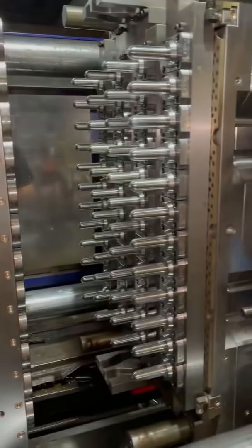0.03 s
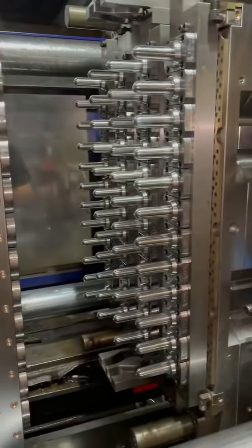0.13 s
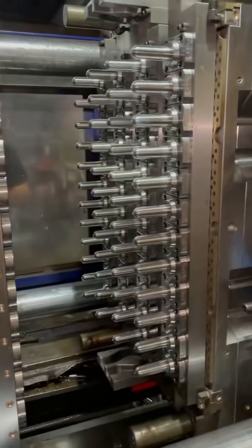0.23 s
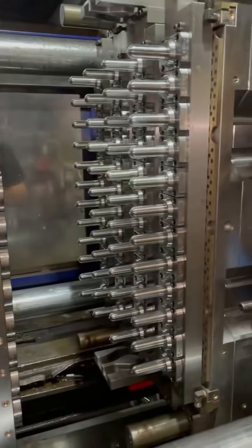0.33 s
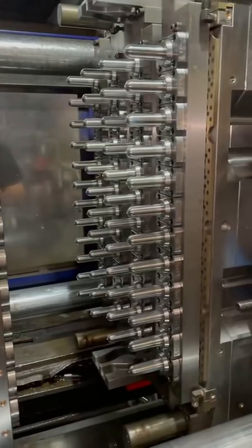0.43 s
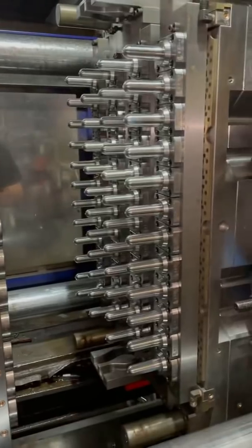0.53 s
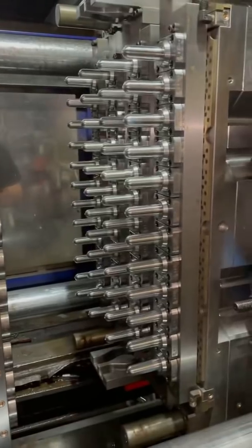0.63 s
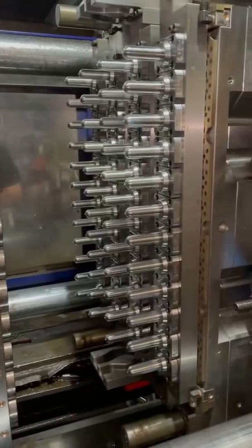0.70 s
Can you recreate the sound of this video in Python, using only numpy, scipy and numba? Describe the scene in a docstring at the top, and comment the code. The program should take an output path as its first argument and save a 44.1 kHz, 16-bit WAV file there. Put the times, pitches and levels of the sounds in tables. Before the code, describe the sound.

Injection moulding machine clatters and clanks its steel mould parts, then vents air in a fading hiss

```python
"""Steel mould parts of an injection moulding machine clatter, clank and squeak: showers of tiny impacts,
single ringing knocks and gliding bands of noise. A hard knock near 2.25 s ends most of the clatter.
Behind them a motor hums (wavering sines) and the drive and factory rumble (coloured, flickering noise).
A valve vents air near 2.5 s (noise again), which slowly dies away. A hall adds its echo to the parts,
and a phone with two close microphone ports listens."""
import sys
import numpy as np
from scipy import signal
from scipy.fft import rfft, irfft
from scipy.io import wavfile
from scipy.ndimage import uniform_filter1d
from numba import njit

SR = 44100
rng = np.random.default_rng(int(sys.argv[2]) if len(sys.argv) > 2 else 0)


def gain_from_decibels(decibels):
    """Convert decibel values to linear amplitude factors."""
    exponent = np.asarray(decibels, float) / 20
    return 10 ** exponent


def master(y):
    """Save y as 16-bit WAV."""
    cut = np.clip(np.atleast_2d(y).T, -1, 1)
    pcm = np.round(cut * 32767)  # scale
    wavfile.write(sys.argv[1], SR, pcm.astype(np.int16))


N = 176400
T = np.arange(N) / SR
GRID_HZ = np.arange(N // 2 + 1) * SR / N


def curve(rows):
    """Gain along time, drawn through (t/s, level/dB) rows."""
    return gain_from_decibels(np.interp(T, *np.array(rows, float).T))


def along_hz(rows, col):
    """One table column, drawn along log frequency for every bin of the whole sound."""
    rows = np.array(rows, float)
    return np.interp(np.log(GRID_HZ + 1), np.log(rows[:, 0]), rows[:, col])


def unit(x):
    """Scale to rms 1."""
    return x / np.sqrt(np.mean(x ** 2))


def walk(rate):
    """Slow random wander: a new random value every 1 / rate s, smoothed twice."""
    k = int(SR / rate)
    steps = np.repeat(rng.standard_normal(N // k + 1), k)
    return uniform_filter1d(uniform_filter1d(steps, k), k)[:N]


def wash(colour, flicker, rate):
    """Coloured noise of rms 1 whose octave bands flicker apart; flicker is in dB before smoothing."""
    spec = rfft(rng.standard_normal(N)) * gain_from_decibels(along_hz(colour, 1))
    octave = np.log2(GRID_HZ + 1)
    out = 0
    for centre in np.arange(4, 15):
        band = irfft(spec * np.clip(1 - abs(octave - centre), 0, 1), N)
        out = out + band * gain_from_decibels(flicker * walk(rate))
    return unit(out)


@njit
def rings(start, hz, t60, size, rise):
    """Sum of decaying sines that swell over the contact time and end after t60."""
    out = np.zeros(N)
    for k in range(len(start)):
        turn = np.exp((2j * np.pi * hz[k] - np.log(1000) / t60[k]) / SR)
        z = size[k] + 0j
        for i in range(int(start[k] * SR), min(N, int((start[k] + t60[k]) * SR))):
            out[i] += z.imag * min(1., (i / SR - start[k]) / rise + .1)
            z *= turn
    return out


def tail(t60):
    """Half a second of decaying noise with unit energy, like a room's echoes."""
    t = T[:SR // 2]
    h = rng.standard_normal(len(t)) * gain_from_decibels(-60 * t / t60)
    return h / np.sqrt(np.sum(h ** 2))


# deep rumble through the floor (t/s, level/dB) and its colour (f/Hz, relative level/dB per Hz)
DEEP = [(0.05, -31.5), (1.32, -49), (1.44, -43), (1.77, -48.5), (2.24, -39), (2.28, -55), (3.0, -56)]
DEEP_COLOUR = [(12, -44), (20, -25), (38, -8), (65, 5), (100, 1.5), (130, -35), (220, -120)]


def deep_rumble():
    """Very low noise through the floor, slowly flickering."""
    return curve(DEEP) * wash(DEEP_COLOUR, 1.8, 3.7)


# machine rumble (t/s, level/dB) and its colour (f/Hz, relative level/dB per Hz)
RUMBLE = [(0.05, -23), (0.64, -26.5), (1.39, -31), (1.6, -41), (1.75, -53), (1.94, -42), (2.18, -36),
          (2.37, -29.5), (2.56, -41), (2.89, -36.5), (3.01, -42.5), (4.0, -43)]
RUMBLE_COLOUR = [(15, -41), (25, -21), (59, -5), (130, 1.5), (200, -4), (226, -4), (354, -1), (467, -21),
                 (609, -17), (700, -11.5), (1000, -63)]


def rumble():
    """Low coloured noise of the machine, rising and falling along its table."""
    return curve(RUMBLE) * wash(RUMBLE_COLOUR, 3.15, 8)


# thin treble hiss of the running machine, then what is left after the motion (t/s, level/dB)
HISS = [(0.05, -41.5), (0.27, -36), (0.54, -39.5), (1.23, -37), (1.39, -35), (1.51, -36), (1.68, -41),
        (2.3, -65), (2.48, -43)]
HISS_IDLE = [(2.6, -68)]
# its colour (f/Hz, relative level/dB per Hz)
HISS_COLOUR = [(2000, -2), (4500, 6), (7000, 1.5), (11500, -0.5), (12500, -56)]


def treble_hiss():
    """Thin high noise whose bands flicker."""
    return curve(HISS + HISS_IDLE) * wash(HISS_COLOUR, 3.5, 15.74)


# running noise of the drive, then what is left after the motion (t/s, level/dB)
DRIVE = [(0.05, -28.5), (0.3, -28.5), (1.03, -28), (1.52, -23), (1.76, -26), (2.13, -27), (2.27, -37),
         (2.5, -33)]
DRIVE_IDLE = [(2.56, -44), (4, -41)]
# its colour (f/Hz, relative level/dB per Hz)
DRIVE_COLOUR = [(180, -17.5), (300, 0.5), (464, -7), (615, -7), (952, -5.5), (1200, -11), (2930, -15),
                (7470, -31.5), (9150, -30), (11900, -40.5), (12500, -110)]


def drive():
    """Broad flickering noise of the running drive."""
    return curve(DRIVE + DRIVE_IDLE) * wash(DRIVE_COLOUR, 3.2, 14)


# hum lines (f/Hz, level/dB) and the gain they share as the load changes (t/s, level/dB)
HUM = [(49, -47.5), (77, -44), (157, -39.5), (198, -34), (238, -41.5)]
HUM_LOAD = [(0, 3.5), (.6, 3.5), (1.0, 4.5), (1.17, 7.5), (1.25, -1.5), (2.0, -11.5), (2.2, 0),
            (2.4, -12.5), (4, -22)]


def motor():
    """Steady hum lines, each wavering slightly in pitch and level."""
    hum = 0
    for hz, db in HUM:
        phase = 2 * np.pi * np.cumsum(hz * (1 + 0.0181 * walk(10))) / SR
        hum = hum + np.sqrt(2) * gain_from_decibels(db + 4.6 * walk(14)) * np.sin(phase)
    return curve(HUM_LOAD) * hum


# jet of vented air (t/s, level/dB) and its colour (f/Hz, relative level/dB per Hz)
JET = [(2.52, -21.5), (2.6, -25.5), (3.0, -29), (3.2, -31), (3.7, -33), (4, -38.5)]
JET_COLOUR = [(150, -41), (250, -30), (341, -20), (383, 2.5), (415, -1), (548, -5), (926, -3), (4840, -3.5),
              (6710, -2), (7400, -4), (10800, -2), (11900, -10), (12400, -90)]
# low roar of the vented air (t/s, level/dB) and its colour (f/Hz, relative level/dB per Hz)
ROAR = [(2.5, -35), (2.7, -29), (3.0, -39), (3.3, -45.5), (4, -60)]
ROAR_COLOUR = [(250, -54), (600, -1.5), (1100, 1.5), (2500, -2.5), (5000, -7), (12000, -43)]
AIR_S, AIR_RISE_S = 2.498, .012


def air():
    """The valve opens quickly; jet noise and a lower roar then die away along their tables."""
    jet = curve(JET) * wash(JET_COLOUR, 2.2, 44)
    roar = curve(ROAR) * wash(ROAR_COLOUR, 1.1, 13)
    opening = np.clip((T - AIR_S) / AIR_RISE_S, 0, 1) ** 2
    return opening * (jet + roar)


# squeaks of sliding metal (start t/s, end t/s, start f/Hz, end f/Hz, width f/Hz, level/dB)
SQUEAKS = [(0.733, 0.785, 3220, 3130, 119, -29), (0.737, 0.786, 2310, 2500, 197, -28),
           (0.742, 0.802, 1500, 1706, 250, -27), (0.79, 0.84, 1680, 1895, 300, -28),
           (0.825, 0.953, 2750, 2790, 78, -38.5), (0.847, 0.898, 5600, 5430, 101, -39),
           (0.876, 0.935, 5800, 5850, 80, -39), (0.914, 0.975, 5400, 5600, 150, -33),
           (0.883, 0.94, 1930, 1950, 101, -40.5), (.935, 0.974, 2140, 1800, 199, -32),
           (1.168, 1.328, 957, 975, 60, -28.5), (1.228, 1.32, 4850, 4930, 149.6, -41),
           (1.895, 2.107, 415, 420, 24.2, -34.5), (1.99, 2.194, 348, 351, 25.1, -41.5),
           (3.764, 3.905, 340, 339.5, 118, -37)]


def squeaks():
    """Narrow gliding bands of stick-slip noise."""
    out = 0
    for start, end, hz0, hz1, width, db in SQUEAKS:
        k = max(int(SR / width), 2)
        # two slow noises carried by a cosine and a sine make one narrow band
        slow = uniform_filter1d(rng.standard_normal((2, N)), k, axis=1) * np.sqrt(k)
        phase = 2 * np.pi * np.cumsum(np.interp(T, [start, end], [hz0, hz1])) / SR
        band = slow[0] * np.cos(phase) + slow[1] * np.sin(phase)
        fade = np.clip(np.minimum(T - start, end - T) / 0.013, 0, 1)
        out = out + gain_from_decibels(db) * fade * band
    return out


# blows on one steel bar (t/s, level/dB) and the bar's modes (f/Hz, level/dB, t60 t/s)
BAR_BLOWS = [(1.338, -5.5), (1.361, -14)]
BAR = [(978, -4, 0.2), (2417, -9, 0.044), (2028, 3, 0.034), (2160, -9, 0.13), (3130, -16, 0.08),
       (1880, -13, 0.029)]
# knocks on other parts, one main ring each (t/s, level/dB, f/Hz, t60 t/s)
KNOCKS = [(0.697, -5, 335, 0.035), (.718, -24, 4700, 0.067), (2.484, -24, 290, 0.13),
          (1.030, -16.5, 2560, 0.07), (1.179, -12.5, 420, 0.22), (1.179, -7, 1260, 0.061),
          (1.174, -14.5, 3200, 0.11), (1.21, -19, 2600, .08), (1.388, -18, 3950, 0.044),
          (1.047, -18, 2550, .1), (1.427, -16.5, 400, 0.21), (1.465, -15, 414, 0.12),
          (1.47, -20, 118, 0.38), (2.506, -25.5, 1300, 0.24), (1.598, -12, 696, .06),
          (1.7, -11, 480, 0.047), (1.487, -14, 3200, .07), (1.487, -12, 4900, .06), (1.514, -9, 1530, 0.1),
          (1.9, -18, 420, 0.12), (1.568, -17.5, 3250, 0.13), (1.586, -12, 400, 0.18),
          (1.63, -15.5, 1280, 0.11), (2.261, -17, 527, 0.089), (2.249, -9.5, 1860, 0.056),
          (2.254, -10, 2550, 0.06), (2.1, -24, 380, .2)]
CONTACT_S = 0.0014


def blows():
    """Bar blows ring all the bar's modes; other knocks ring a close pair of pitches."""
    rows = []
    for start, db in BAR_BLOWS:
        for hz, mode_db, t60 in BAR:
            detuned = hz * (1 + 0.0054 * rng.standard_normal())
            rows.append((start, detuned, t60, gain_from_decibels(db + mode_db)))
    for start, db, hz, t60 in KNOCKS:
        rows.append((start, hz, t60, gain_from_decibels(db) * 0.69))
        rows.append((start, hz * 1.045, t60 * 0.32, gain_from_decibels(db) * 0.58))
    return rings(*np.array(rows).T.copy(), CONTACT_S)


# bursts of clatter (t/s, rise t/s, hold t/s, t60 t/s, level/dB, tilt/dB per octave)
CLATTER = [(0.641, 0.015, 0.014, 0.19, -20.5, -5), (.697, 0.0028, 0.0084, 0.24, -23, 6.5),
           (0.709, 0.0025, 0.03, 0.11, -17.5, -2), (0.935, 0.017, 0.019, 0.24, -28.5, -2),
           (1.026, 0.008, 0.023, 0.1, -22.5, -4), (1.173, 0.0052, 0.0088, 0.23, -14, -3),
           (1.231, 0.005, 0.015, 0.54, -25, -0.5), (1.335, 0.0036, 0.013, 0.26, -24, 0),
           (1.425, 0.001, 0.012, 0.17, -18.5, -5), (1.444, 0.013, 0.011, 0.2, -15.5, -2),
           (1.485, .004, 0.01, 0.12, -17.5, -1), (1.513, .002, 0.011, 0.34, -16.5, -3.5),
           (1.564, .003, 0.0092, 0.18, -19.5, -2), (1.583, .004, 0.023, 0.23, -19, -2.5),
           (1.625, 0.016, 0.032, 0.91, -22.5, -4.5), (1.718, 0.2, 0.21, 0.56, -33, -4.5),
           (2.207, 0.043, 0.0084, 0.073, -22.5, -3.5), (2.249, 0.0064, 0.0051, 0.03, -13, -3),
           (2.258, 0.0045, 0.009, 0.033, -16.5, -4), (2.279, .003, 0.023, 0.068, -27, -6),
           (2.497, 0.0028, 0.018, 0.073, -28.5, -2), (3.927, .004, 0.011, 0.086, -33, 4)]
# broad colour of the clatter (f/Hz, relative level/dB per Hz)
CLATTER_COLOUR = [(59, -36), (100, -16.5), (379, -4.5), (1080, -6.5), (1530, -5), (2100, -7), (2700, -12.5),
                  (3200, -6.5), (3900, -8.5), (4340, -13.5), (4940, -7), (7390, -12.5), (9230, -12),
                  (11800, -25.5), (12500, -100)]
# resonances of the mould plates (f/Hz, width f/Hz, level/dB over the broad colour)
PLATES = [(418, 27, 1.5), (970, 16, 1.5), (1310, 33, 2.5), (1500, 23, 5.5), (1910, 67, 3), (2070, 55, 5),
          (3170, 77, 3.5), (3730, 190, 3), (4800, 120, 2.5)]
CLICKS_PER_S, CLICK_SCATTER_DB, RING_SCALE = 4000, 2.7, 16


def clatter():
    """Dense small impacts of steel parts, each a short ring at its own pitch, over a scraping noise."""
    u = rng.random((4, 60000))
    when = np.cumsum(-np.log(1 - u[0])) / CLICKS_PER_S
    inside = when < T[-1]
    u, when = u[:, inside], when[inside]
    hz = 120 * 100 ** u[1]
    t60 = RING_SCALE * (0.6 + 2 * u[2]) / hz ** 0.75 / 6  # higher pitches die sooner
    size = gain_from_decibels(-CLICK_SCATTER_DB * np.log(1 - u[3]))
    clicks = rings(when, hz, t60, size, .0002)

    # flatten the spectrum, then give it the broad colour and the plate resonances
    spec = rfft(unit(clicks) + 0.81 * rng.standard_normal(N))
    flat = spec / np.sqrt(uniform_filter1d(abs(spec) ** 2, size=1601))
    plates = 1 + sum((gain_from_decibels(db) - 1) / (1 + (2 * (GRID_HZ - f) / width) ** 2) for f, width, db in PLATES)
    coloured = flat * gain_from_decibels(along_hz(CLATTER_COLOUR, 1)) * plates

    octave = np.log2((GRID_HZ + 100) / 1000)
    out = 0
    for start, rise, hold, t60, db, tilt in CLATTER:
        decay = gain_from_decibels(-60 * np.clip(T - start - rise - hold, 0, None) / t60)
        env = np.clip((T - start) / rise, 0, 1) * decay
        out = out + gain_from_decibels(db) * env * unit(irfft(coloured * gain_from_decibels(tilt * octave), N))
    return out


HALL_T60_S, HALL_DB = 0.36, -17.5


def hall(hits):
    """The hall's echo of the impacts and squeaks: a tail of decaying noise."""
    return gain_from_decibels(HALL_DB) * signal.fftconvolve(hits, tail(HALL_T60_S))[:N]


# port pair (f/Hz, left minus right level/dB, left lead/rad, level of the smeared unrelated part relative to the
# mid/dB)
PORTS = [(60, -1, -0.029, -48), (250, 3, -0.1, -16.5), (500, 5, -0.54, -9.5), (1060, 1.5, -0.9, -7.5),
         (1740, 0.6, -0.2, -14), (3480, 0.5, -1.26, -9.5), (4440, -0.5, 1, -4), (5300, 0.5, 0.45, -11),
         (6300, 0, 1, -7), (7200, -0.5, 0.78, -17), (12000, 0.5, 1, -14)]


def ports(mid):
    """Two close ports differ in level and phase by frequency, plus a smeared, unrelated share."""
    ratio = gain_from_decibels(along_hz(PORTS, 1)) * np.exp(1j * along_hz(PORTS, 2))
    loose = signal.fftconvolve(mid, tail(.3))[:N]
    related = rfft(mid) * (ratio - 1) / (ratio + 1)
    unrelated = rfft(loose) * gain_from_decibels(along_hz(PORTS, 3))
    side = irfft(related + unrelated, N)
    return np.array([mid + side, mid - side])


def scene():
    """All sources and the hall's echo, heard at the two ports."""
    background = deep_rumble() + rumble() + treble_hiss() + drive() + motor()
    hits = squeaks() + blows() + clatter()
    return ports(background + air() + hits + hall(hits))


def band_limit(x):
    """A steep low-pass at the top of the band."""
    return signal.sosfilt(signal.butter(12, 12680, fs=SR, output="sos"), x)


def record(dry):
    """The phone starts 0.036 s late with a short fade-in and rounds the loudest peaks."""
    fade_in = np.clip((T - .036) / 0.0036, 0, 1)
    soft = np.tanh(dry * fade_in * 0.87) / 0.93
    return band_limit(soft)


dry = scene()
out = record(dry)
master(out)
```